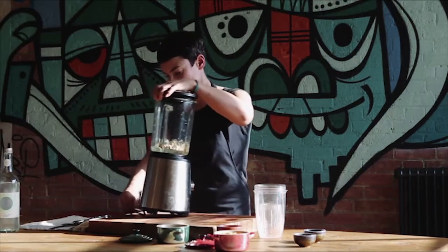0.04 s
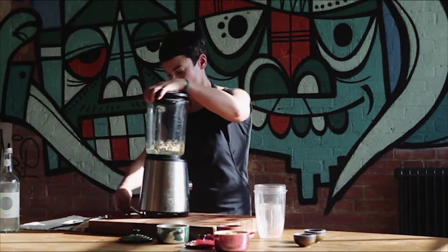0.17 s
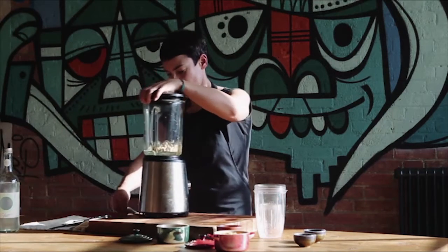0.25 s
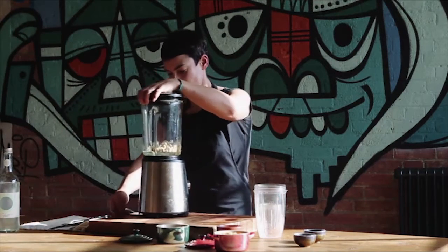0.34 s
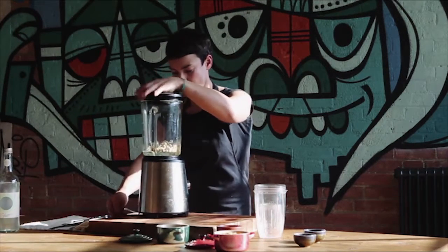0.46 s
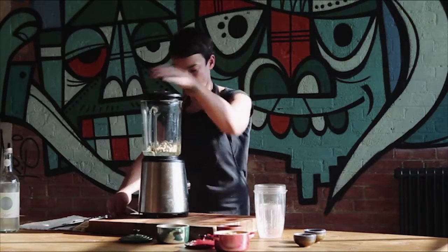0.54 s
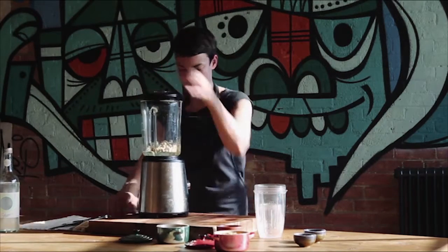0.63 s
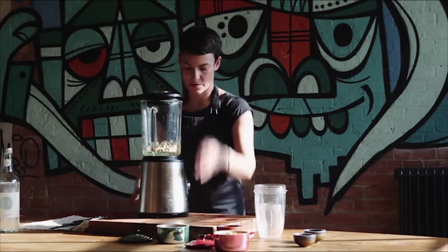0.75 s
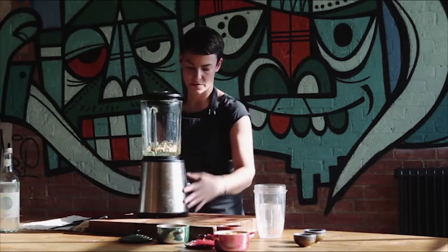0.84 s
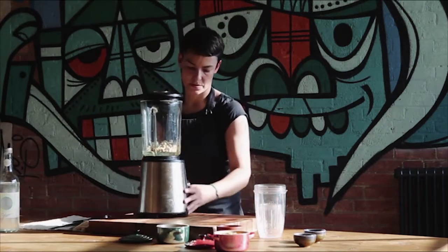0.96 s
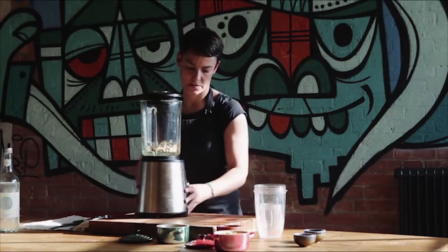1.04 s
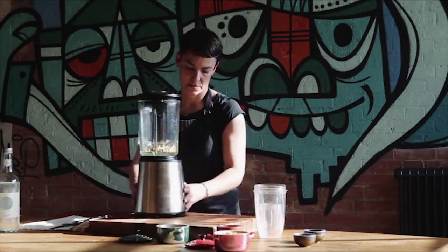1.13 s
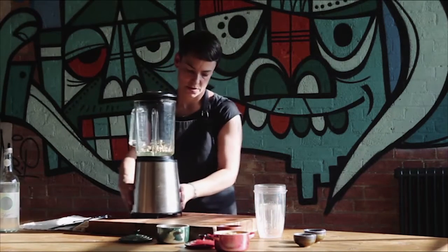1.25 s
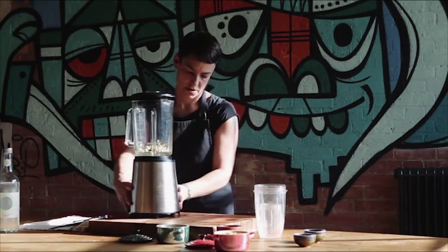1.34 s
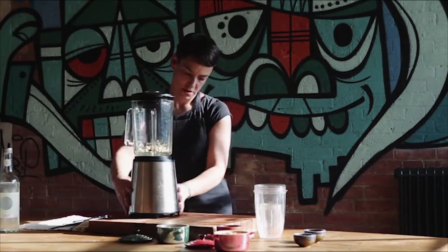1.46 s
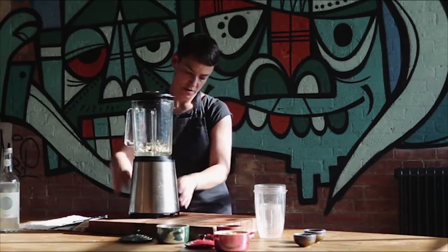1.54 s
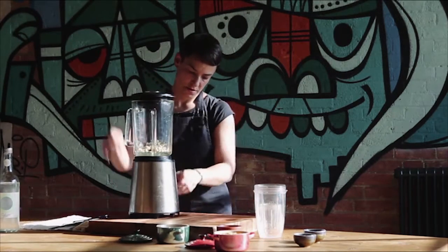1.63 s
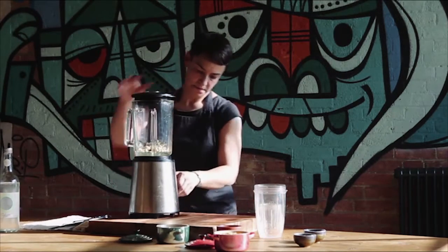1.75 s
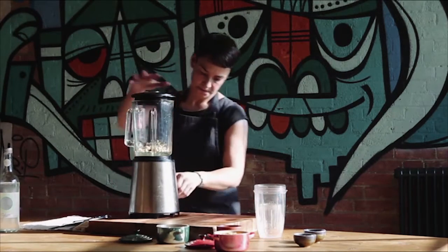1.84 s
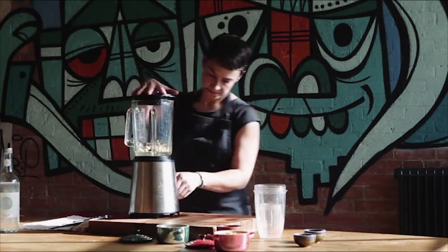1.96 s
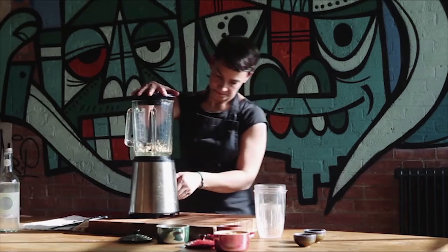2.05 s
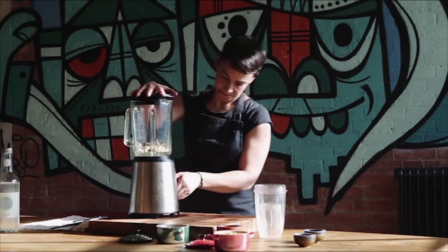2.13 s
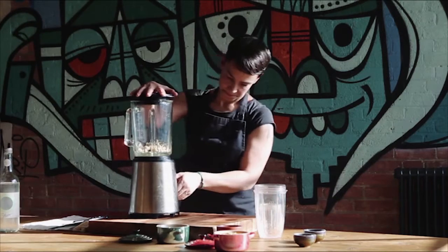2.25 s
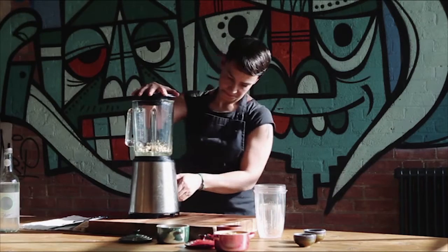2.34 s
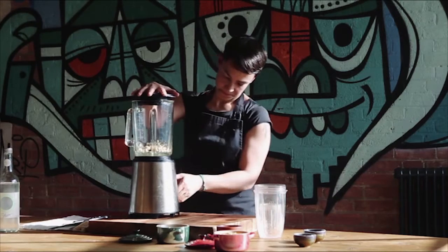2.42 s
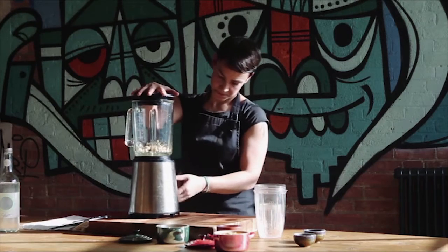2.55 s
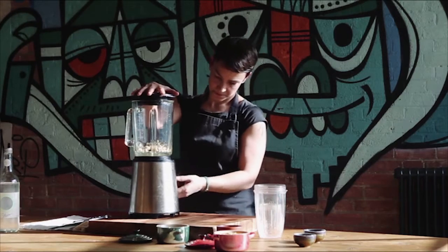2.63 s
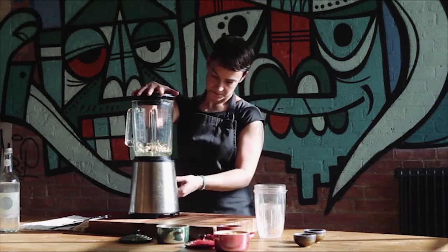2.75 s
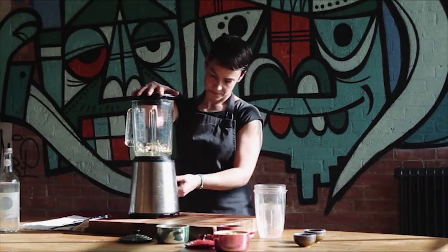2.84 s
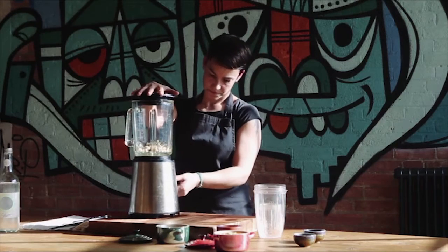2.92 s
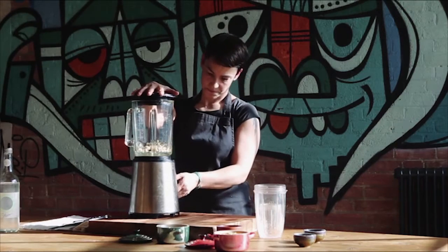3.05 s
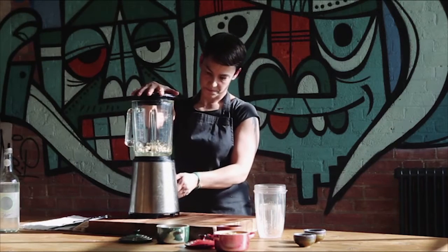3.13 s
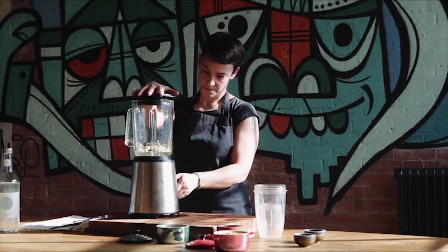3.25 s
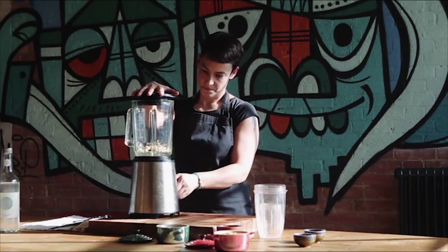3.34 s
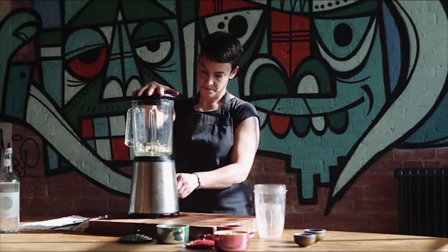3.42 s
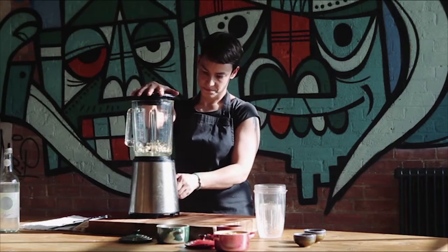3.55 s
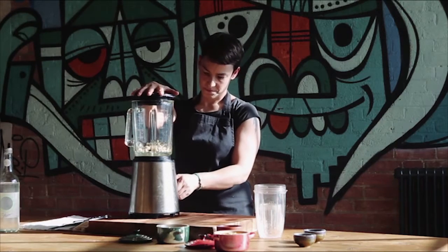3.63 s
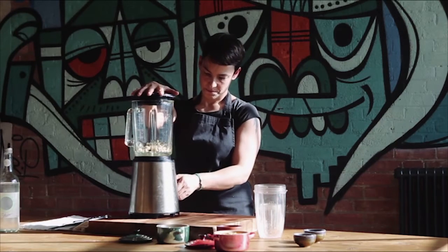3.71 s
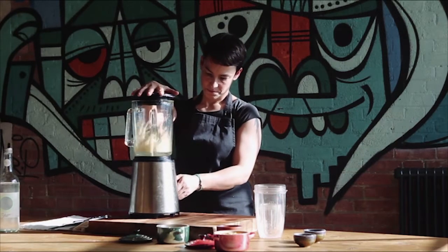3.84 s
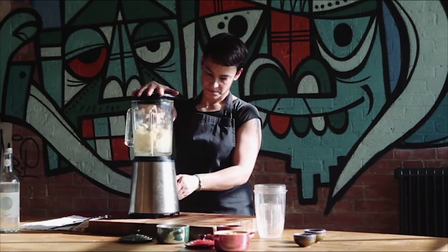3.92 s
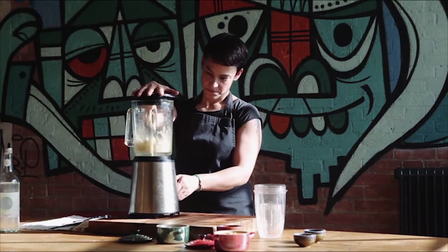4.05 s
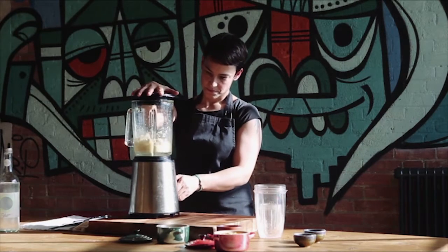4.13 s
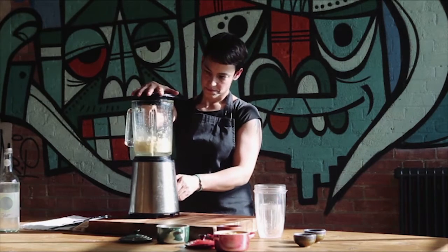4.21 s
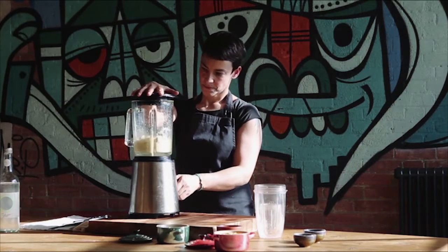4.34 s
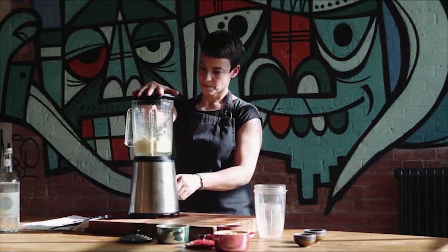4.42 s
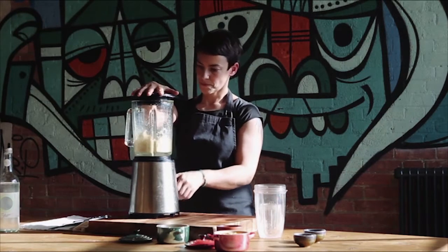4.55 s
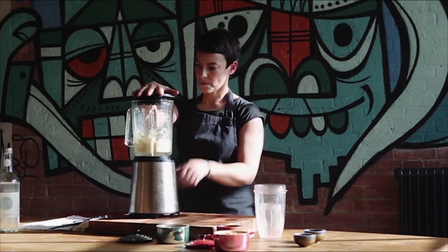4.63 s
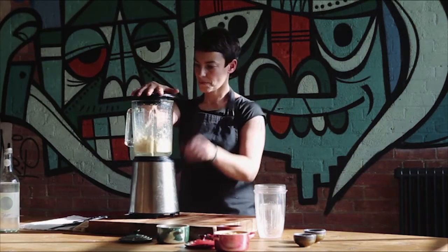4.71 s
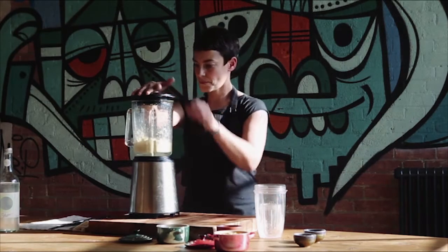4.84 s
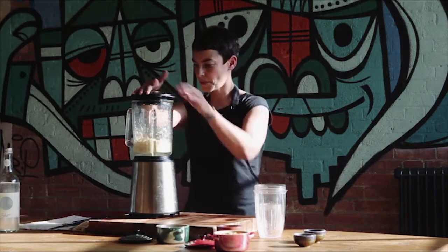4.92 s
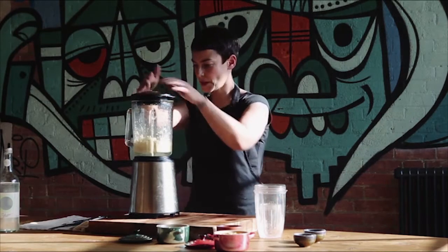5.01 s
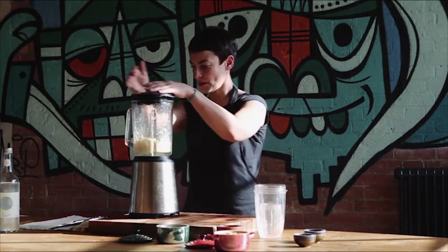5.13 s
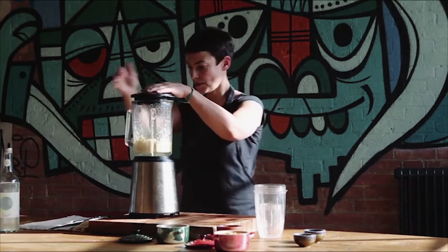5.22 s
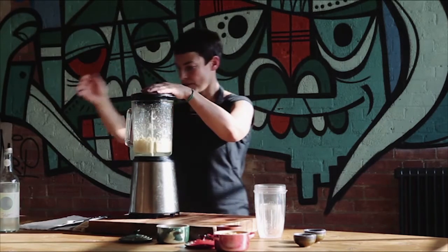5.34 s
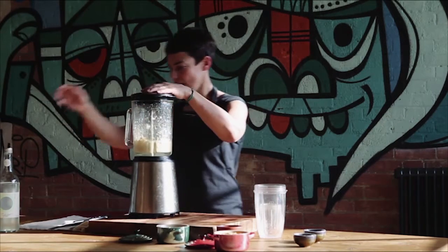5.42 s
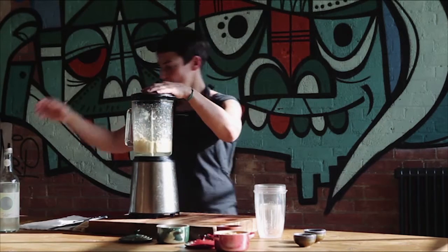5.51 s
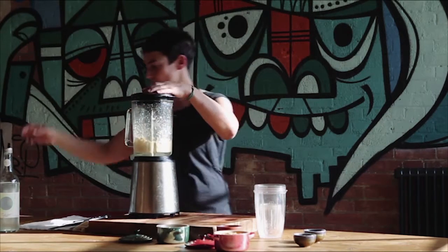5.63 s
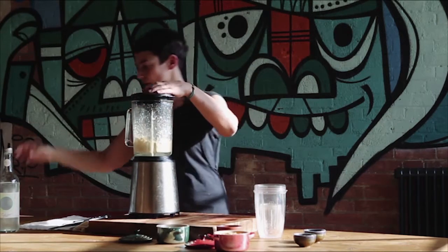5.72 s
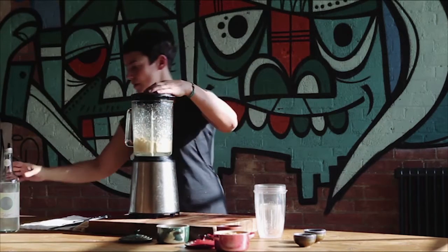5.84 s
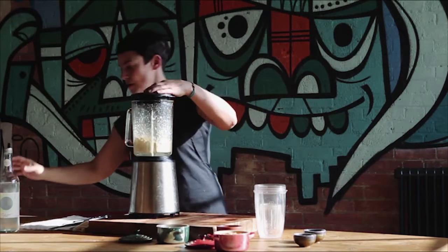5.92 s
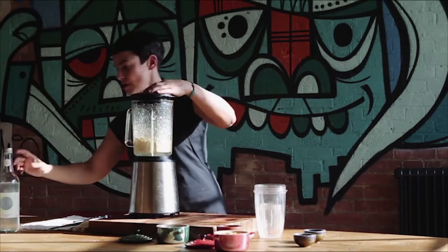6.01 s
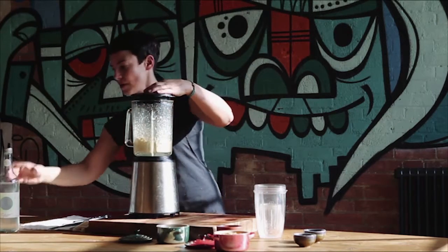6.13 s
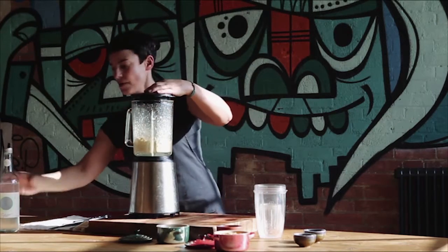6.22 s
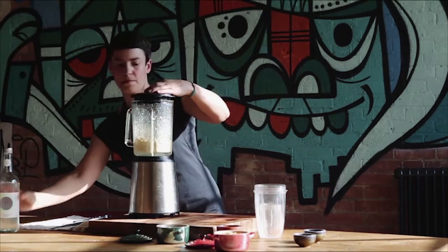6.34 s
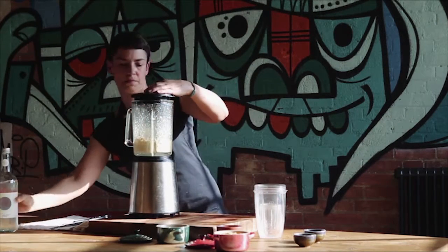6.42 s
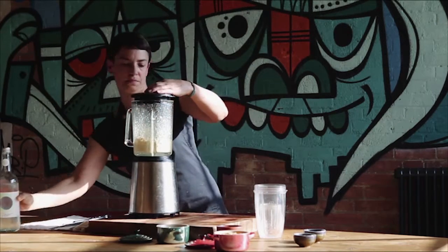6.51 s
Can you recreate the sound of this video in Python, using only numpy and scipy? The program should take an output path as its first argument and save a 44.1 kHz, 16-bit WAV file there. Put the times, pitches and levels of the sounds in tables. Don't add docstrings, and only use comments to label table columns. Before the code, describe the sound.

In a large brick room, a blender is handled on a wooden board: sharp plastic clicks, two heavy thumps, a soft slide with a tiny rubber squeak, taps and cloth rustle. A dial ratchets through notches. Just before four seconds the motor kicks in, its whine climbing quickly as nuts clatter against glass, then settles into steady hum, churning and rushing air. One fairly close microphone, short room echo.

```python
import sys
import numpy as np
from scipy import signal
from scipy.io import wavfile

SR = 44100
rng = np.random.default_rng(int(sys.argv[2]) if len(sys.argv) > 2 else 0)


def int16_out(signal):
    q = np.round(np.clip(np.atleast_2d(signal).T, -1, 1) * 32767)
    wavfile.write(sys.argv[1], SR, q.astype(np.int16))


def attenuation_scalar(level_db):
    decades = np.asarray(level_db, float) / 20
    return 10 ** decades


N = 289737
TIME = np.arange(N) / SR
SWITCH_ON_S, TOP_SPEED_HZ, FAN_BLADES = 3.87, 303.1, 13
BEFORE, AFTER = slice(0, round(4 * SR)), slice(round(3.8 * SR), N)

# centre in seconds, spread in seconds, speed change in turns per second.
LOAD_CHANGES = [
    (4.09, .05, -12),
    (5.143, .267, 3.8),
]
# frequency in Hz, level in dB.
HUM_PATH = [(130, -47), (200, -41.5), (233, -36), (245, -32.5), (251, -30.5), (258, -38), (262, -33),
            (272, -33)]
# frequency in Hz, spread in Hz, level in dB.
WHINE_PATH = [(1830, 200, -36.5), (2720, 170, -29.5), (2990, 110, -30.5), (3275, 65, -31.5),
              (3365, 22, -39), (3450, 32, -30), (3525, 55, -26.5), (3610, 30, -29)]
# multiple of shaft speed, level in dB, loudest at seconds, spread in seconds.
FAINT_ORDERS = [(2, -46, 6.0, .6), (3, -47, 4.5, 1.2), (24, -50, 6.3, .5), (26, -53, 6.2, .5),
                (39, -51, 6.3, .5), (39, -57, 4.25, .15), (48, -55, 5.05, .25), (48, -57, 4.3, .12),
                (52, -58, 5.4, .3), (61, -58, 4.9, .15)]
# multiple of shaft speed, level in dB, loudest at seconds,
# spread in seconds.
SLOT_HISS = [(12.8, -35.5, 4.02, .06), (48, -42, 4.9, .45), (41, -44, 5.0, .5), (34.5, -42, 5.15, .35),
             (24, -42, 6.3, .5), (51, -47, 6.2, .5), (29, -44, 5.9, .4), (42, -43, 4.4, .25),
             (59, -48, 5.4, .4)]
# time in seconds, level in dB.
FLING = [
    (3.89, -43.5),
    (3.97, -36),
    (4.03, -29),
    (4.17, -21),
    (4.22, -24.5),
    (4.9, -26),
    (5.14, -40),
    (5.55, -31.5),
    (6.57, -31.5),
]
# time in seconds, gain over steady fling in dB.
SURGES = [(3.869, 11), (3.93, 4.5), (4.25, 0.5), (4.38, 2.5), (4.77, 3), (4.89, 2), (4.982, 4), (5.408, 6),
          (5.49, 6), (5.6, 3), (5.68, 4.5), (5.79, 2), (6.2, 4), (6.28, 4)]
# frequency in Hz, width in Hz, level in dB.
GLASS_COARSE = [(3436, 270, 0.5), (3635, 270, 2), (3802, 170, -2.5), (4390, 270, -8), (5470, 1100, -16)]
# frequency in Hz, width in Hz, level in dB.
GLASS_FINE = [(3855, 260, 3.5), (4110, 210, 5.5), (4420, 390, 4)]
# frequency in Hz, width in Hz, level in dB.
JAR_AIR = [(660, 80, 0), (480, 160, -9), (900, 200, -9)]
# frequency in Hz, density in dB per Hz.
HOUSING = [(90, -14), (190, -12), (300, 3), (500, -3), (900, 1.5), (1270, -5), (1950, -9.5), (3000, -6.5),
           (3600, -17), (4700, -48), (8000, -70)]
# frequency in Hz, density in dB per Hz.
COOLING = [(2710, -12.5), (4600, 0.5), (5030, -4.5), (6590, -2.5), (7710, -3.5), (13500, -7.5),
           (15100, -14), (16000, -18)]
# frequency in Hz, width in Hz, level in dB.
POCKET_HIGH = [(2118, 340, 1), (2676, 300, 0.5)]
# frequency in Hz, width in Hz, level in dB.
POCKET_LOW = [(1557, 300, 0)]
# time in seconds, peak in dB, brightness in Hz.
THUMPS = [(0.038, -42, 323), (0.174, -44, 904), (0.687, -27, 318), (0.695, -13.5, 298), (0.921, -22.5, 721),
          (0.943, -12.5, 247), (1.284, -38, 218), (1.883, -30, 229), (2.022, -40, 323), (2.183, -38, 425),
          (2.252, -41, 655), (2.367, -22, 304), (2.531, -60, 223), (2.645, -63, 215)]
# frequency in Hz, level in dB, T60 in seconds.
BOARD = [(165, -19, .07), (231, -9, .07), (269, -8, .07), (330, -8, .05), (430, -9, .05), (515, -7, .06),
         (620, -10, .05), (760, -12, .05), (1050, -16, .04), (1400, -21, .03)]
# time in seconds, peak in dB, ring in Hz, low part in dB.
CLICKS = [(0.038, -44.5, 2360, -61), (0.1213, -38, 2650, -59), (0.1742, -64, 2850, -63),
          (0.3387, -43.5, 4000, -65), (0.62, -19.5, 4270, -50), (0.6425, -14, 5600, -36),
          (0.944, -34.5, 2350, -54), (1.8786, -46, 2340, -64), (2.024, -26.5, 3430, -44.5),
          (2.2541, -60, 2410, -45), (2.3398, -48, 3310, -54), (2.364, -45, 2970, -48),
          (2.649, -47.5, 2920, -79), (2.7258, -51, 2720, -70), (2.9093, -55, 2340, -82),
          (2.938, -47, 2420, -63.5), (3.723, -55.5, 2520, -84), (3.871, -22, 4170, -46)]
# time in seconds, snap peak in dB, low part in dB.
DETENTS = [(3.003, -56, -77), (3.0988, -29.5, -33.5), (3.255, -39.5, -43.5), (3.269, -47, -44.5),
           (3.2989, -55, -68), (3.3483, -46, -49), (3.4058, -38.5, -47), (3.4211, -33.5, -37.5),
           (3.4302, -51, -46), (3.451, -37.5, -47), (3.494, -42.5, -49)]
# time in seconds, level in dB.
HOLLOW_KNOCKS = [
    (.04, -50),
    (2.022, -40),
    (2.366, -37),
    (3.1, -44),
    (3.905, -33),
]
# frequency in Hz, level in dB, T60 in seconds.
HOLLOW = [(315, 0, .08), (950, -9, .04), (3370, -22, .02)]
# frequency in Hz, width in Hz, level in dB.
SLIDE_BODY = [(3350, 250, 0), (4450, 150, -3), (5070, 130, -2), (7000, 250, -8)]
# start in seconds, length in seconds, low shuffle in dB, high rustle in dB,
# crisp top in dB.
GESTURES = [
    (0.0, 0.39, -66, -78.5, -82),
    (0.656, 0.14, -48, -58.5, -62.5),
    (0.908, 0.15, -45.5, -60, -77),
    (1.14, 0.31, -59, -66.5, -93),
    (1.5, 0.28, -71.5, -68, -74.5),
    (1.916, .17, -55, -63, -70),
    (2.165, 0.25, -54.5, -74.5, -92),
    (2.524, 0.28, -78, -81.5, -77),
    (3.25, 0.14, -69.5, -87, -92),
]
# frequency in Hz, density in dB per Hz.
SHUFFLE = [(40, -27), (100, 3), (300, 1.5), (500, -5), (1000, -9.5), (3000, -53), (6000, -54)]
# frequency in Hz, density in dB per Hz.
RUSTLE = [(700, -3.5), (1500, -5.5), (3000, -7), (6000, -21.5), (10000, -29), (16000, -28.5)]
# time in seconds, level in dB.
JOLTS = [(.1, -70), (.64, -49.5), (.95, -61), (1.45, -67), (1.77, -63), (2.06, -59), (2.4, -40.5),
         (3.1, -54), (3.27, -61), (3.5, -61), (3.87, -54), (4.31, -56)]
# frequency in Hz, density in dB per Hz.
ROOM_TONE = [(20, -17), (60, 3), (100, 30), (300, -6), (600, 2), (1500, -7), (4000, -34), (9000, -38),
             (16000, -55)]
# frequency in Hz, T60 in seconds.
ROOM_T60 = [(100, 0.37), (400, 0.36), (1500, 0.51), (5000, 0.31), (14000, 0.15)]


def rms_one(x):
    return x / np.sqrt(np.mean(x ** 2) + 1e-20)


def butter(x, order, hz, kind):
    return signal.sosfilt(signal.butter(order, hz, kind, fs=SR, output="sos"), x)


def at_hz(points, hz):
    point_hz, value = np.transpose(points)
    return np.interp(np.log(hz), np.log(point_hz), value)


def swell(start_s, length_s):
    return np.sin(np.pi * np.clip((TIME - start_s) / length_s, 0, 1))


def bump(at_s, spread_s):
    return np.exp(-((TIME - at_s) / spread_s) ** 2)


def drift(rate_hz):
    r = np.exp(-80 * np.pi * rate_hz / SR)
    white = rng.standard_normal(N // 40 + 2002)
    slow = signal.lfilter([1], [1, -2 * r, r * r], white)[2000:]
    return np.interp(np.arange(N) / 40, np.arange(len(slow)), rms_one(slow))


def ring(x, hz, t60_s):
    r, w = attenuation_scalar(-60 / (t60_s * SR)), 2 * np.pi * hz / SR
    return signal.lfilter([0, np.sin(w)], [1, -2 * r * np.cos(w), r * r], x + 1e-18)


def resonances(x, peaks):
    out = 0
    for k, (hz, width_hz, level_db) in enumerate(peaks):
        r = np.exp(-np.pi * width_hz / SR)
        poles = [1, -2 * r * np.cos(2 * np.pi * hz / SR), r * r]
        zeros = [(1 - r * r) / 2, 0, (r * r - 1) / 2]
        out = out + (-1) ** k * attenuation_scalar(level_db) * signal.lfilter(zeros, poles, x)
    return out


def bands(size):
    edges_hz = 20 * 2 ** np.arange(0, 10, .5)
    white = rng.standard_normal((2, size))
    for k, (low_hz, high_hz) in enumerate(zip(edges_hz, edges_hz[1:])):
        yield np.sqrt(low_hz * high_hz), butter(white[k % 2], 2, [low_hz, high_hz], "band")
    yield 16000, butter(white[1], 2, edges_hz[-1], "high")


def coloured_noise(spectrum, patchy_db, rate_hz, during):
    together, mix = drift(rate_hz)[during], 0
    lowest_hz, highest_hz = spectrum[0][0] / 1.5, spectrum[-1][0] * 1.5
    for hz, band in bands(len(together)):
        if lowest_hz < hz < highest_hz:
            flicker = 0.28 * together + drift(rate_hz)[during]
            mix = mix + attenuation_scalar(at_hz(spectrum, hz) + patchy_db * flicker) * band
    out = np.zeros(N)
    out[during] = rms_one(mix)
    return out


def shaft_speed():
    since = np.maximum(TIME - SWITCH_ON_S, 0)
    missing = 171.5 * np.exp(-since / .166) + 92.8 * np.exp(-since / 2.124)
    return TOP_SPEED_HZ - missing + sum(change * bump(s, spread) for s, spread, change in LOAD_CHANGES)


def motor():
    speed = shaft_speed()
    whine = attenuation_scalar(-54)
    for hz, spread_hz, level_db in WHINE_PATH:
        whine = whine + attenuation_scalar(level_db) * np.exp(-((FAN_BLADES * speed - hz) / spread_hz) ** 2)
    strain = np.clip(1 - speed / 215, 0, 1)
    jitter = .001 * drift(15) + .07 * strain * drift(60)
    turns = 2 * np.pi * np.cumsum(speed * (1 + jitter)) / SR
    out = attenuation_scalar(at_hz(HUM_PATH, speed)) * np.sin(turns)
    out += whine * attenuation_scalar((1.0 + 7 * strain) * drift(37)) * np.sin(FAN_BLADES * turns)
    for multiple, level_db, loudest_s, spread_s in FAINT_ORDERS:
        presence_db = level_db - 8 * ((TIME - loudest_s) / spread_s) ** 2 + 3 * drift(23)
        out += attenuation_scalar(presence_db) * np.sin(round(multiple) * turns)
    buzz = attenuation_scalar(-41) * swell(start_s=3.885, length_s=.075) * np.sin(2 * np.pi * 100 * TIME)
    return np.sqrt(2) * (out * np.clip((TIME - 3.93) / 0.061, 0, 1) + buzz)


def slot_hiss():
    turns = 2 * np.pi * np.cumsum(shaft_speed()) / SR
    out = 0
    for multiple, level_db, loudest_s, spread_s in SLOT_HISS:
        presence_db = level_db - 8 * ((TIME - loudest_s) / spread_s) ** 2
        out = out + attenuation_scalar(presence_db) * drift(350) * np.sin(multiple * turns)
    return np.sqrt(2) * out * (TIME > SWITCH_ON_S)


def nuts(clumps):
    glass_db = np.interp(TIME, *np.transpose(FLING))
    glass_db = glass_db + sum(gain_db * bump(s, spread_s=.022) for s, gain_db in SURGES)
    clogs_s = 4.7
    jar_db = np.interp(TIME, [clogs_s - .08, clogs_s + .08], [-27.5, -40]) + 2.0 * drift(11)
    since = np.maximum(TIME - SWITCH_ON_S, 0)
    fine = np.clip(0.7 * (1 - np.exp(-since / 1.2)), 0, 1)
    hit = rng.random(N) < 7000 * attenuation_scalar(3.0 * clumps) / SR
    strength = attenuation_scalar(3.0 * np.minimum(rng.exponential(1, N), 5))
    grains = hit * strength * rng.choice([-1, 1], N)
    modes = np.sqrt(1 - fine) * rms_one(resonances(grains, GLASS_COARSE))
    modes += np.sqrt(fine) * rms_one(resonances(grains, GLASS_FINE))
    glass = rms_one(resonances(modes, [(3910, 1300, 0)]))
    puffs = rms_one(grains) + 3.1 * rng.standard_normal(N)
    jar = rms_one(resonances(resonances(puffs, JAR_AIR), [(686, 320, 0)]))
    return attenuation_scalar(glass_db + 2.5) * glass + attenuation_scalar(jar_db - 7.0) * jar


def blending():
    octaves = np.log2(shaft_speed() / TOP_SPEED_HZ)
    housing_db, cooling_db = -29.5 + 2.5 * octaves, -29 + 8.5 * octaves
    clumps = drift(24)
    out = nuts(clumps)
    out += attenuation_scalar(housing_db - 1.0) * coloured_noise(HOUSING, patchy_db=1.0, rate_hz=19, during=AFTER)
    air = coloured_noise(COOLING, patchy_db=0.8, rate_hz=3.9, during=AFTER)
    dull = butter(air, 2, 9000, "low")
    brisk = np.clip(0.64 + (TIME - 3.9) / 3.6, 0, 1)
    out += attenuation_scalar(cooling_db + 0.55 * clumps) * (dull + brisk * (air - dull))
    return out * np.clip((TIME - 3.869) / .006, 0, 1)


def vortex():
    churn = rng.standard_normal((2, N)) * attenuation_scalar(0.41 * drift(24))
    high = rms_one(resonances(resonances(churn[0], POCKET_HIGH), [(2540, 3100, 0)]))
    low = rms_one(resonances(resonances(churn[1], POCKET_LOW), [(1660, 600, 0)]))
    high_db = -37.5 + 7.5 * bump(at_s=5.1, spread_s=0.3) + 1.6 * drift(8)
    low_db = -31.5 + 3.3 * bump(at_s=5.38, spread_s=0.27) + 1.34 * drift(7.7)
    opening = np.clip((TIME - 4.06) / 0.049 + .5, 0, 1)
    return (attenuation_scalar(high_db) * high + attenuation_scalar(low_db - 5.0) * low) * opening


def wobble():
    low = rms_one(butter(rng.standard_normal(N), 2, [80, 170], "band"))
    return attenuation_scalar(-50) * low * bump(at_s=4.06, spread_s=0.57) * (TIME > SWITCH_ON_S)


def strikes(times_s, levels_db, modes, spread_db):
    at, out = np.round(np.array(times_s) * SR).astype(int), np.zeros(N)
    chance = rng.standard_normal((len(at), len(modes)))
    for k, (hz, level_db, t60_s) in enumerate(modes):
        blows = np.zeros(N)
        blows[at] = attenuation_scalar(levels_db[:, k] + level_db + spread_db * chance[:, k])
        out += ring(blows, hz, t60_s)
    return out


def thumps():
    s, peak_db, bright_hz = np.transpose(THUMPS)
    octaves = np.log2(np.array(BOARD)[:, 0] / bright_hz[:, None])
    levels_db = peak_db[:, None] - 9.5 - 4 * np.abs(octaves)
    return butter(strikes(s - .001, levels_db, BOARD, spread_db=3), 2, 190, "high")


def hollow_knocks():
    s, level_db = np.transpose(HOLLOW_KNOCKS)
    return strikes(s, np.tile(level_db[:, None], len(HOLLOW)), HOLLOW, spread_db=7.5)


def burst(out, s, level_db, low_hz, high_hz, t60_s):
    n, i = round(max(.034, t60_s) * SR), round(s * SR)
    envelope = attenuation_scalar(level_db - 60 * TIME[:n] / t60_s) * np.minimum(TIME[:n] / 0.0014, 1)
    puff = rng.standard_normal(n) * envelope
    track = out.copy()
    track[i:i + n] += butter(puff, 2, [low_hz, min(high_hz, .45 * SR)], "band")
    return track


def clicks():
    out = np.zeros(N)
    for s, peak_db, ring_hz, low_db in CLICKS:
        out = burst(out, s, peak_db - 8.5, 770, 10500, 0.023)
        out = burst(out, s, peak_db + 5.0, ring_hz / 1.56, ring_hz * 1.14, 0.01)
        out = burst(out, s, low_db + 20.5, 174, 1370, 0.053)
    return out


def detents():
    out = np.zeros(N)
    for s, snap_db, knock_db in DETENTS:
        out = burst(out, s, snap_db - 4.0, 1500, 12000, 0.021)
        out = burst(out, s, snap_db + 3.5, 9600, 12200, .022)
        out = burst(out, s, snap_db + 8.5, 10100, 12700, 0.013)
        out = burst(out, s, snap_db - 18, 9800, 11800, .2)
        out = burst(out, s, knock_db + 12.5, 550, 1960, 0.036)
        out = burst(out, s, knock_db + 19.0, 310, 435, 0.048)
    return out


def squeak():
    start_s, length_s = 1.410, .019
    slip_hz = np.interp(TIME, [start_s, start_s + length_s], [590, 460])
    slips = 2 * np.pi * np.cumsum(slip_hz) / SR
    envelope = np.sqrt(np.abs(swell(start_s, length_s)))
    return attenuation_scalar(-42.5) * envelope * (np.sin(slips) + .7 * np.sin(2 * slips))


def slide():
    start_s, length_s, gap_width_hz = 1.14, .62, 75
    gap_hz = np.interp(TIME, [start_s, start_s + length_s], [2320, 1930])
    gap = drift(gap_width_hz) * np.sin(2 * np.pi * np.cumsum(gap_hz) / SR)
    body = rms_one(resonances(rng.standard_normal(N) * attenuation_scalar(2.5 * drift(25)), SLIDE_BODY))
    envelope = np.abs(swell(start_s, length_s)) ** .2 * attenuation_scalar(-2 * (TIME - start_s))
    return attenuation_scalar(-62.5) * (gap + attenuation_scalar(-5) * body) * envelope


def gesture_gains():
    rise_s, fall_db_per_s, rest_db = 0.062, 82.5, np.array([-68, -79.5, -80.5])
    gains = attenuation_scalar(rest_db)[:, None] * np.ones(N)
    for start_s, length_s, *levels_db in GESTURES:
        rise = np.clip((TIME - start_s) / rise_s, 0, 1)
        fall = attenuation_scalar(-fall_db_per_s * np.maximum(TIME - start_s - length_s, 0))
        gains = gains + attenuation_scalar(np.array(levels_db))[:, None] * rise * fall
    return gains * (TIME < SWITCH_ON_S + .1)


def handling():
    low_gain, high_gain, crisp_gain = gesture_gains()
    rest_db, running_db, rise_db_per_s, fall_db_per_s = -73, -62, 300, 120
    shake = attenuation_scalar(np.where(TIME < SWITCH_ON_S, rest_db, running_db) + 1.6 * drift(3.9))
    for s, level_db in JOLTS:
        away_db = np.maximum(rise_db_per_s * (s - TIME), fall_db_per_s * (TIME - s))
        shake = shake + attenuation_scalar(level_db - away_db)
    rumble = rms_one(butter(rng.standard_normal(N), 2, [18, 70], "band"))
    low = coloured_noise(SHUFFLE, patchy_db=4.0, rate_hz=35, during=BEFORE)
    rustle = coloured_noise(RUSTLE, patchy_db=-0.5, rate_hz=6.2, during=BEFORE)
    crisp = rms_one(butter(rustle, 2, 6500, "high"))
    return attenuation_scalar(2.5) * low_gain * low + attenuation_scalar(5) * high_gain * rustle + crisp_gain * crisp + shake * rumble


def room(x):
    t = TIME[:SR]
    tail = sum(band * attenuation_scalar(-60 * t / at_hz(ROOM_T60, hz)) for hz, band in bands(SR))
    tail = tail * np.clip((t - .004) / 0.01, 0, 1)
    return signal.fftconvolve(x, tail / np.sqrt(np.sum(tail ** 2)))[:N]


def room_tone():
    return attenuation_scalar(-66.5) * coloured_noise(ROOM_TONE, patchy_db=3.4, rate_hz=6.8, during=BEFORE)


def scene():
    tones, low = motor(), thumps()
    sharp = clicks() + detents() + squeak() + hollow_knocks()
    echo = room(attenuation_scalar(-0.5) * low + attenuation_scalar(-14) * sharp + attenuation_scalar(-15) * tones)
    running = tones + slot_hiss() + blending() + vortex() + wobble()
    return np.tile(running + low + sharp + slide() + handling() + echo + room_tone(), (2, 1))


def top_cut(x):
    return signal.sosfilt(signal.butter(12, 16530, fs=SR, output="sos"), x)


def record(dry):
    cut = signal.sosfilt(signal.ellip(10, .3, 45, 15900, fs=SR, output="sos"), dry)
    side, wide_count, wide_octaves = np.zeros(N), 15, .3
    for when, where in rng.random((wide_count, 2)):
        s, low_hz = SWITCH_ON_S + .2 + 2.4 * when, 4200 * 3 ** where
        i = slice(round((s - .03) * SR), round((s + .03) * SR))
        backwards = cut[0, i][::-1]
        band = butter(backwards, 4, [low_hz, low_hz * 2 ** wide_octaves], "band")
        side[i] += .55 * band * swell(s - .023, .046)[i]
    return top_cut(cut + side * [[1], [-1]])


dry = scene()
out = record(dry)
int16_out(out)
```